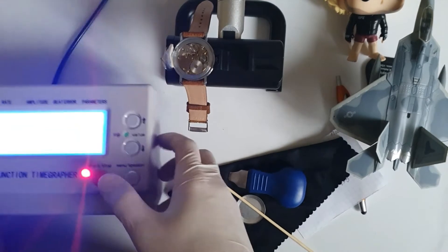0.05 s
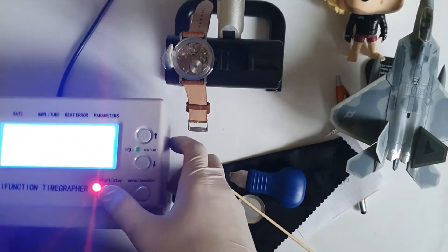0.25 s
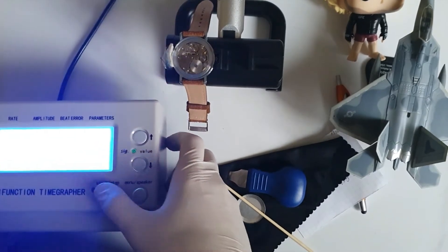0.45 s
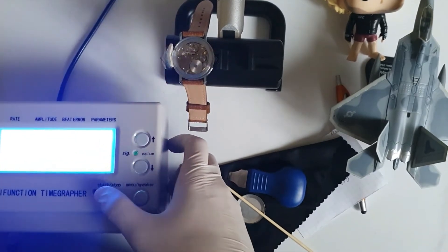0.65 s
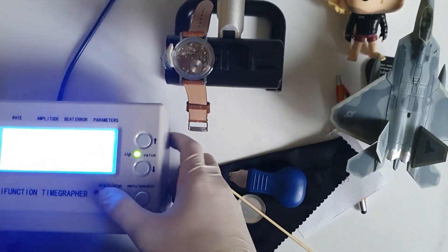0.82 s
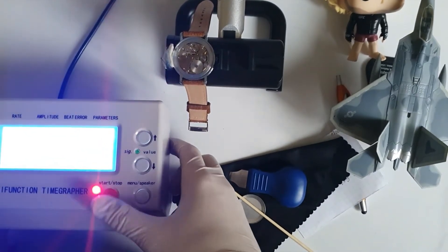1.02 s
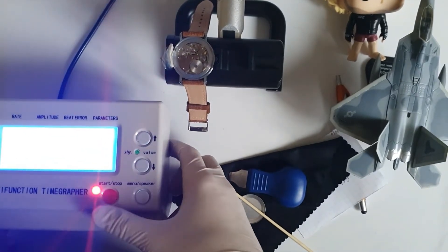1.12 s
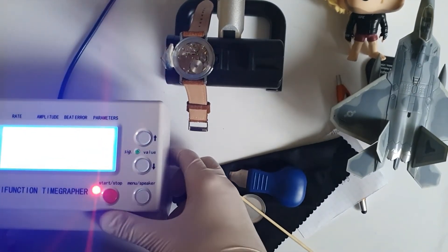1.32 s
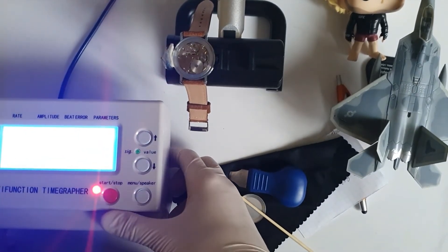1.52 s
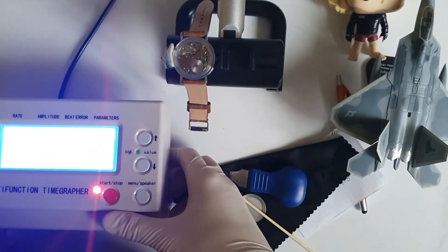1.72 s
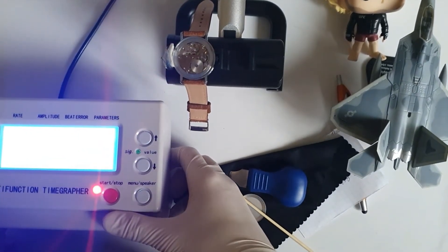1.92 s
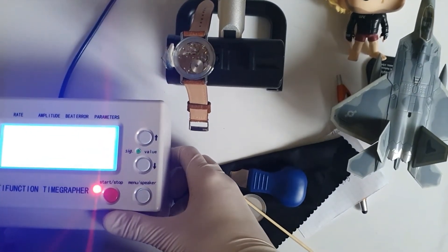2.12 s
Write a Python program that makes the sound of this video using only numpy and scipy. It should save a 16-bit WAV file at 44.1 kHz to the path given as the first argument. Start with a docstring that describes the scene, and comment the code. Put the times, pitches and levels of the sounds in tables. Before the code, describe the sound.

Push-buttons on a small plastic instrument click brightly with a hollow case knock; early on the case slides briefly, thuds onto the desk and judders to rest. Small quiet room, close microphone, faint low hum.

```python
"""Plastic instrument on a desk

A small plastic instrument slides over a desk (random tiny slips), knocks down on its feet (damped modes
with a little scrape) and judders to rest (slips shaking low resonances). Its push-buttons are pressed and
let go: each snap is a bright tick of noise and spring ring, then a hollow knock of the case.
A small, quiet room rings after these sounds, over a wavering low hum (sine plus noise) and faint hiss."""
import sys
import numpy as np
from scipy import signal
from scipy.fft import rfft, irfft
from scipy.io import wavfile

SR = 44100
rng = np.random.default_rng(int(sys.argv[2]) if len(sys.argv) > 2 else 0)


def int16_out(signal):
    """Quantize to a 16-bit WAV file."""
    q = np.round(np.clip(np.atleast_2d(signal).T, -1, 1) * 32767)
    wavfile.write(sys.argv[1], SR, q.astype(np.int16))


N = 94815
T = np.arange(N) / SR  # time in seconds
RING = T[:4096]  # time axis of one short sound

# how loud the sliding is: time_s, level_db
SLIDE_LEVEL = [(0, -38.5), (0.06, -44), (0.105, -43), (0.145, -49), (0.19, -52.5), (0.23, -49.5),
               (0.33, -74), (0.45, -100)]
# tone colour of the sliding: freq_hz, gain_db
SLIDE_COLOUR = [(24, -45.5), (40, -19.5), (107, -9.5), (183, -9.5), (239, -4.5), (291, -6), (381, -13.5),
                (464, 0), (512, -13), (654, -12.5), (739, -24.5), (1040, -19), (1660, -30), (2340, -27.5),
                (3640, -37.5), (6240, -34.5), (7970, -43), (11800, -37), (14000, -45)]
SLIDE_SLIPS_PER_S, SLIDE_SPREAD_DB, SLIDE_ROOM_DB = 3000, 3.5, -4

# how loud the low hum is: time_s, level_db
HUM_LEVEL = [(0, -51.5), (0.26, -64), (0.32, -53.5), (0.42, -63), (0.7, -61), (1.0, -65), (1.28, -71.5),
             (1.44, -58.5), (1.62, -68.5), (1.97, -65.5), (2.06, -81.5)]
HUM_HZ, HUM_WAVER, HUM_LAG_S = 62.7, 0.4, 0.0017  # waver is relative to the tone; the right ear lags
# tone colour of the faint room noise: freq_hz, gain_db
FLOOR_COLOUR = [(15, -36), (25, -9.5), (70, -19), (89, -4.5), (113, -12.5), (286, -27), (403, -23),
                (684, -31.5), (892, -30), (2640, -38.5), (7420, -46.5), (14000, -44)]
FLOOR_DB = -72

# how loud the judder of the rubber feet is: time_s, level_db
JUDDER_LEVEL = [(0.23, -57), (0.275, -39), (0.315, -38), (0.345, -50), (0.385, -59), (0.44, -42),
                (0.5, -42.5), (0.55, -50), (0.66, -53), (0.76, -62.5), (0.83, -68), (0.9, -72), (1.0, -99)]
# low resonances of case and desk: pitch_hz, width_hz, level_db
JUDDER_MODES = [(70, 16, -14.5), (133.8, 60, -5), (267.7, 38, -2), (344.7, 52.6, -2.5), (418.8, 130, -2)]
JUDDER_SLIPS_PER_S, JUDDER_ROOM_DB = 400, -15
JUDDER_APART_HZ = 114  # a resonance here has equal shared and separate parts in the two ears

# button snaps: start_s, tick_db, tick_treble_edge_hz, case_db, case_pitch_hz, desk_thud_db,
# tick_sent_to_room_db
BUTTONS = [(0.0591, -21, 2710, -38.5, 470, -40, -2.5), (0.449, -26.5, 7300, -33.5, 480, -64, 3.5),
           (0.5803, -25, 1600, -32.5, 526, -47.5, -0.5), (0.909, -21, 14000, -32.5, 491, -36.5, 0.5),
           (1.0133, -16.5, 3230, -22.5, 514.4, -40, -9.5), (1.6097, -40.5, 2210, -63.5, 439, -72, -9)]
# tone colour of the tick: freq_hz, gain_db
TICK_COLOUR = [(500, -13.5), (900, -3), (1300, 4), (1800, -2.5), (2500, -2.5), (3500, -1), (4400, 0),
               (6500, -5), (7700, -11.5), (9400, -10), (11400, -15), (12800, -23), (14000, -26)]
# ring of the metal spring in a switch: pitch_hz, level_db, decay_s
SPRING = [(2900, -34.5, 0.001), (3295, -34.5, 0.0016), (3550, -30, .004), (4275, -29, 0.0025)]
# modes of the case under a button: ratio_to_case_pitch, level_db, time_to_peak_s
CASE_MODES = [(0.7, -16.5, 0.0051), (1, -1, .0056), (1.45, -20.5, 0.0052), (1.75, -27, .004),
              (2.35, -24, 0.00397), (2.95, -24.5, 0.0034), (3.45, -30.5, 0.0027)]
RATTLE_DECAY_S, RATTLE_DB, TICK_LOW_HZ = 0.003, 1, 706  # the tick is thinned below the last value
CASE_SWELL, THUD_HZ, THUD_PEAK_S = 4.6, 226.3, 0.0075
TICK_ROOM_DB, CASE_ROOM_DB = 2.5, -6.5

# knocks of the feet on the desk, and a few lighter taps: start_s, blow_db, pitch_ratio, scrape_db
KNOCKS = [(0.1992, -41.5, 1.4, -43), (0.2155, -30.5, 1.445, -42.5), (0.219, -14, 1.02, -30),
          (0.2399, -32.5, 1.28, -40), (0.254, -37.5, 1.4, -31), (0.3615, -44, 1.71, -40),
          (0.4332, -43, 1.43, -72), (0.544, -42.5, 1.19, -62), (0.818, -47.5, 0.7, -79),
          (0.895, -51.5, 1.17, -76), (1.084, -47.5, 0.57, -68), (1.138, -61.5, 0.9, -66.5)]
# modes of the instrument on its feet: pitch_hz (before the knock's pitch_ratio), level_db, time_to_peak_s
FEET_MODES = [(135, -21.5, 0.01496), (265, -3.5, 0.0062), (368, 2, 0.003797), (546, -10, .003),
              (1054, -25.5, .003), (1541, -29, 0.00287)]
# tone colour of the scrape in a knock: freq_hz, gain_db
SCRAPE_COLOUR = [(300, -9), (850, 1.5), (1200, -2), (1600, -4), (2000, -2), (2800, -13.5), (4500, -12.5),
                 (6500, -16), (9000, -27.5), (14000, -35)]
FEET_SWELL, KNOCK_ROOM_DB = 5.6, -2
SCRAPE_DECAY_S, SCRAPE_ROOM_DB = 0.0017, 10.5

# shading of the contact sounds at the right ear: freq_hz, gain_db
SHADE = [(400, -1), (1500, -7.5), (3200, -5.5), (5500, -10), (9000, -2), (13000, -1.5)]
# how strongly the case radiates into the room: freq_hz, gain_db
RADIATION = [(130, -5), (350, 0), (550, -0.5), (850, 7), (1500, 4.5), (2300, 5.5)]
BODY_PAN_DB = 4  # left ear over right

# how long the room takes to fade by 60 dB: freq_hz, fade_time_s
ROOM_T60 = [(100, 0.59), (350, 0.17), (600, 0.3), (1000, 0.32), (2000, .42), (4000, 0.35), (10000, 0.52),
            (13500, 0.11)]
ROOM_SHARED_HZ = 780  # the ears hear more alike below this
WALL_S, WALL_DB = 0.034, -9.5  # wall echo

NOTCH_HZ, NOTCH_Q, TOP_HZ = 7700, 10.5, 14100  # microphone dip and top limit


def amp(db):
    """Turn decibels into a plain gain."""
    return 10 ** (np.asarray(db) / 20)


def unit(x):
    """Scale to an rms (average strength) of 1."""
    return x / np.sqrt(np.mean(x ** 2))


def pan(db):
    """Left and right gains for a level difference."""
    return amp(np.array([[db], [-db]]) / 2)


def fade(points):
    """Gain over time along a curve of (time_s, level_db)."""
    times, levels = np.array(points).T
    return amp(np.interp(T, times, levels))


def add(out, start_s, x):
    """Mix a short sound in at a given time."""
    i = int(start_s * SR)
    out[:, i:i + x.shape[-1]] += x[..., :N - i]


def colour(x, points, edge_hz=1e6):
    """Causal filter through (freq_hz, gain_db) points, rolling off above an edge."""
    n = 2 * x.shape[-1]
    f = np.maximum(np.fft.rfftfreq(n, 1 / SR), 1)
    hz, db = np.array(points).T
    gain = amp(np.interp(np.log(f), np.log(hz), db))
    gain = gain / np.hypot(1, (f / edge_hz) ** 2)
    # folding the cepstrum gives minimum phase: the filter reacts only after the sound
    cepstrum = irfft(np.log(gain))
    cepstrum[1:n // 2] *= 2
    cepstrum[n // 2 + 1:] = 0
    response = np.exp(rfft(cepstrum))
    return irfft(rfft(x, n) * response)[..., :n // 2]


def resonate(x, hz, width_hz):
    """One resonance, applied twice for a steeper peak."""
    b, a = signal.iirpeak(hz, hz / width_hz, fs=SR)
    return signal.lfilter(b, a, signal.lfilter(b, a, x))


def mode(hz, peak_s, swell):
    """A damped mode that builds up to a peak and dies away."""
    u = RING / peak_s
    envelope = (u * np.exp(1 - u)) ** swell
    return envelope * np.cos(2 * np.pi * hz * (RING - peak_s))


def slips(per_s, spread_db):
    """Random stick-slip pulses; a larger spread makes their sizes less even."""
    happens = rng.random(N) < per_s / SR
    sign = rng.choice([-1, 1], N)
    size = amp(spread_db * rng.exponential(size=N).clip(0, 4))
    return unit(happens * sign * size)


def two_ears(make, apart):
    """A signal shared by both ears plus a part that each has alone."""
    shared = make()
    return unit(np.array([shared + apart * make() for _ in range(2)]))


def burst(decay_s, rattle_db):
    """A hard contact with a few milliseconds of rattle after it."""
    x = rng.standard_normal((2, len(RING))) * np.exp(-RING / decay_s)
    x *= amp(rattle_db) / np.sqrt(np.sum(x ** 2) / 2)
    x[:, 0] += 1
    return x


def shade(x):
    """The right ear faces away from the instrument."""
    left, right = x
    return np.array([left, colour(right, SHADE)])


def room(x, wet_db, send=None, onset_s=0.0049):
    """Direct sound plus a wall echo and a diffuse tail whose bass is alike in both ears."""
    t = T[:SR // 2]
    f = np.fft.rfftfreq(len(t), 1 / SR)
    mid, side = np.exp(2j * np.pi * rng.random((2, len(f))))
    width = f / np.hypot(f, ROOM_SHARED_HZ)
    ears = (mid + np.array([[1], [-1]]) * width * side) / np.hypot(1, width)

    # overlapping bands, each dying away in its own time
    hz, t60 = np.array(ROOM_T60).T
    tail = 0
    for weights, fade_s in zip(np.eye(len(hz)), t60):
        noise = irfft(ears * np.interp(f, hz, weights), len(t))
        tail = tail + noise * np.exp(-np.log(1000) * t / fade_s)

    tail *= 1 - np.exp(-(t / onset_s) ** 2)
    tail *= 1 + amp(WALL_DB) * np.exp(-((t - WALL_S) / 0.004) ** 2)
    tail /= np.sqrt(np.sum(tail ** 2) / 2)
    source = x if send is None else send
    return x + amp(wet_db) * signal.fftconvolve(source, tail, axes=1)[:, :N]


def slide():
    """Dense little slips as the case is pushed over the desk."""
    pulses = two_ears(lambda: slips(SLIDE_SLIPS_PER_S, SLIDE_SPREAD_DB), apart=0.9)
    rub = unit(colour(pulses, SLIDE_COLOUR)) * fade(SLIDE_LEVEL)
    return shade(room(rub, SLIDE_ROOM_DB))


def background():
    """A wavering low hum, a sine mixed with narrow noise, over faint room noise and hiss."""
    waver = unit(resonate(rng.standard_normal((2, N)), HUM_HZ, width_hz=42.8))
    tone = np.sin(2 * np.pi * HUM_HZ * np.array([T, T - HUM_LAG_S]))
    hum = unit(tone + HUM_WAVER * waver) * fade(HUM_LEVEL) * pan(db=5.0)
    hiss = unit(colour(rng.standard_normal((2, N)), FLOOR_COLOUR))
    return hum + amp(FLOOR_DB) * hiss


def judder():
    """The rubber feet creep under the hand and shake the low resonances of case and desk."""
    shaking = 0
    for hz, width_hz, db in JUDDER_MODES:
        pulses = two_ears(lambda: slips(JUDDER_SLIPS_PER_S, spread_db=-0.16), apart=JUDDER_APART_HZ / hz)
        shaking = shaking + amp(db) * unit(resonate(pulses, hz, width_hz))
    return room(unit(shaking) * fade(JUDDER_LEVEL) * pan(db=3.5), JUDDER_ROOM_DB)


def snap(edge_hz):
    """Contact, rattle and the short ring of the spring; a finger on the button dulls it."""
    contact = colour(burst(RATTLE_DECAY_S, RATTLE_DB), TICK_COLOUR)
    spring = 0
    for hz, db, decay_s in SPRING:
        spring = spring + amp(db) * np.exp(-RING / decay_s) * np.sin(2 * np.pi * hz * RING)
    bass_cut = [(TICK_LOW_HZ / 4, -18), (TICK_LOW_HZ, 0)]
    return colour(contact + spring, bass_cut, edge_hz)


def radiate(body, wet_db):
    """The case is heard directly; its higher modes fill the room more than its low ones."""
    direct = body * pan(BODY_PAN_DB)
    return room(direct, wet_db, colour(direct, RADIATION), onset_s=0.0094)


def buttons():
    """Each switch snaps over; the jolt rings the case and thuds into the desk."""
    ticks, to_room, body = np.zeros((3, 2, N))
    for start_s, tick_db, edge_hz, case_db, case_hz, thud_db, room_db in BUTTONS:
        click = amp(tick_db) * snap(edge_hz)
        add(ticks, start_s, click)
        add(to_room, start_s, amp(room_db) * click)
        case = sum(amp(db) * mode(case_hz * ratio, peak_s, CASE_SWELL) for ratio, db, peak_s in CASE_MODES)
        add(body, start_s, amp(case_db) * case)
        add(body, start_s, amp(thud_db) * mode(THUD_HZ, THUD_PEAK_S, swell=2.9))
    return shade(room(ticks, TICK_ROOM_DB, to_room)) + radiate(body, CASE_ROOM_DB)


def knocks():
    """The feet catch and drop on the desk: dull blows with a little scrape; a few lighter taps follow later."""
    scrapes, body = np.zeros((2, 2, N))
    for start_s, blow_db, ratio, scrape_db in KNOCKS:
        blow = sum(amp(db) * mode(hz * ratio, peak_s, FEET_SWELL) for hz, db, peak_s in FEET_MODES)
        add(body, start_s, amp(blow_db) * blow)
        scrape = colour(burst(SCRAPE_DECAY_S, rattle_db=12.5), SCRAPE_COLOUR)
        add(scrapes, start_s, amp(scrape_db) * scrape)
    return radiate(body, KNOCK_ROOM_DB) + shade(room(scrapes, SCRAPE_ROOM_DB))


def scene():
    """All the sounds together."""
    return slide() + background() + judder() + buttons() + knocks()


def record(dry):
    """The microphone has a narrow dip in the treble; the top is cut."""
    b, a = signal.iirnotch(NOTCH_HZ, NOTCH_Q, fs=SR)
    dipped = signal.lfilter(b, a, dry)
    top_cut = signal.ellip(8, 0.2, 70, TOP_HZ, fs=SR, output="sos")
    return signal.sosfilt(top_cut, dipped)


dry = scene()
out = record(dry)
int16_out(out)
```